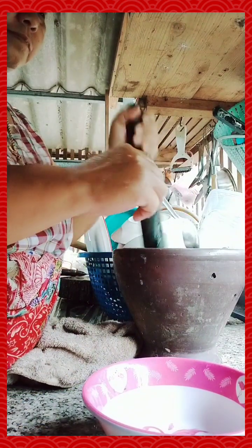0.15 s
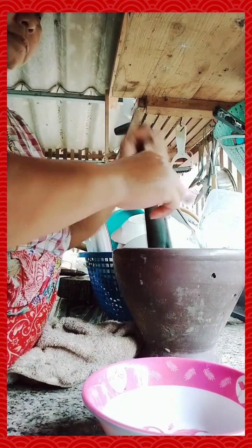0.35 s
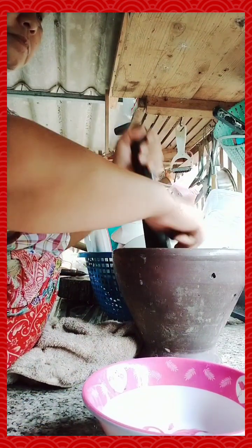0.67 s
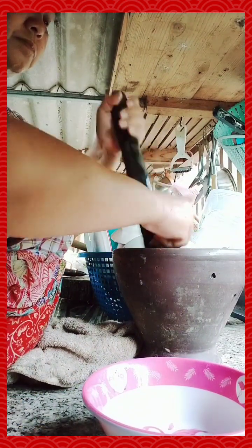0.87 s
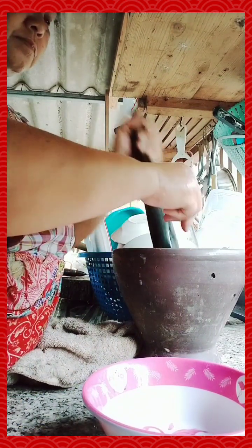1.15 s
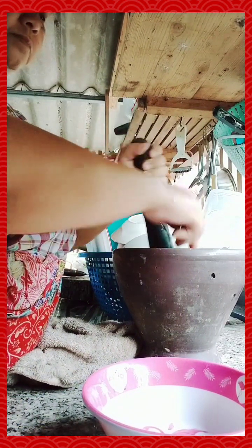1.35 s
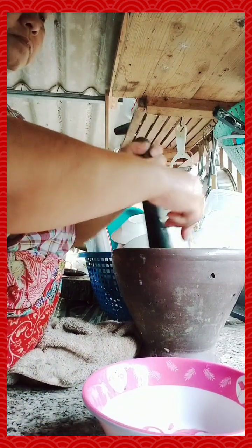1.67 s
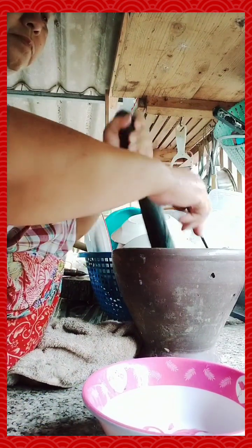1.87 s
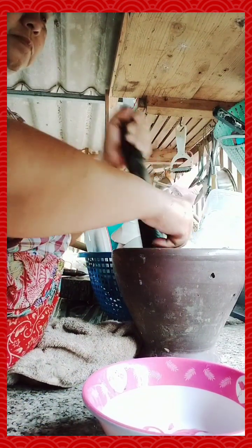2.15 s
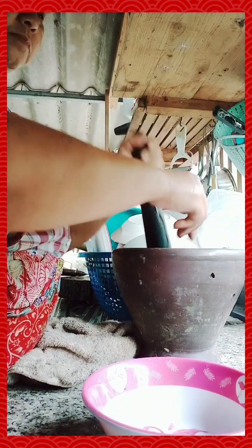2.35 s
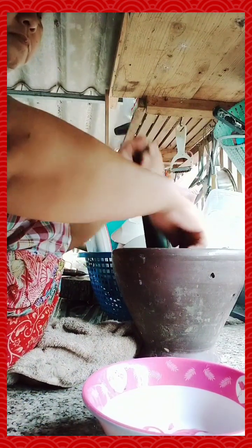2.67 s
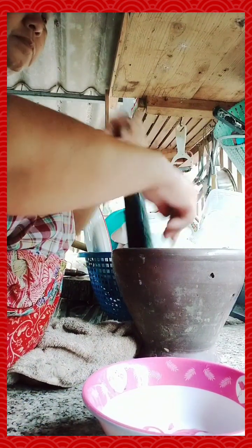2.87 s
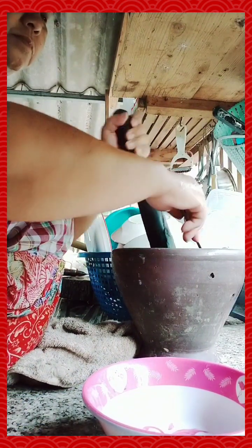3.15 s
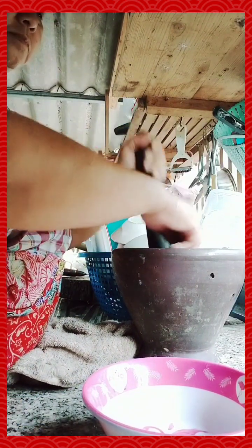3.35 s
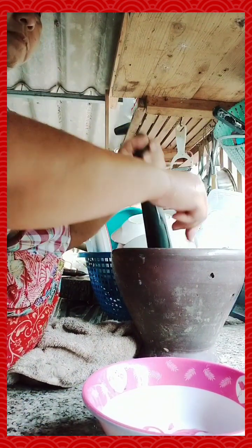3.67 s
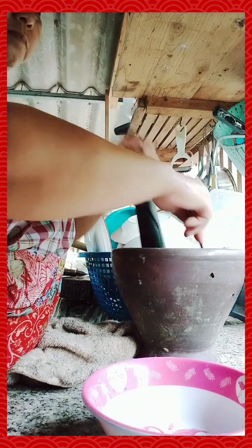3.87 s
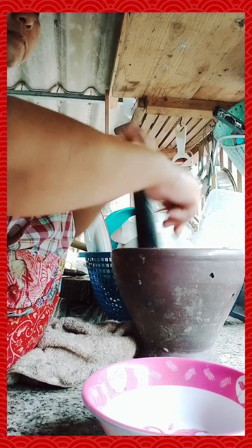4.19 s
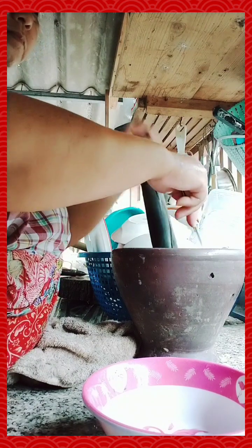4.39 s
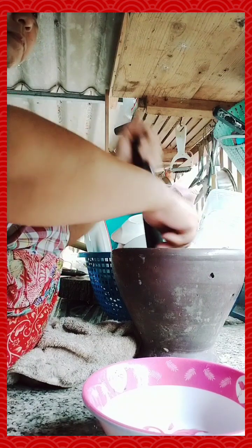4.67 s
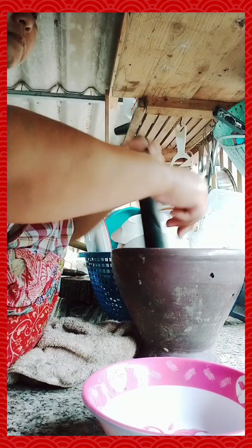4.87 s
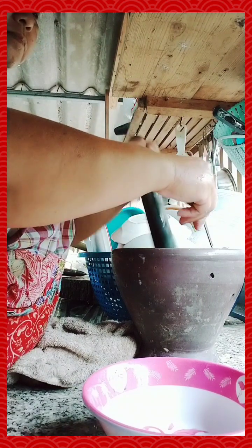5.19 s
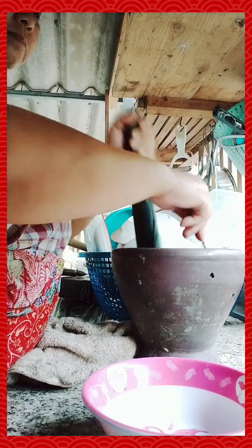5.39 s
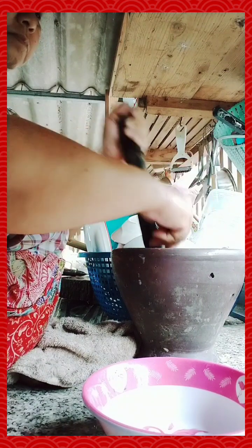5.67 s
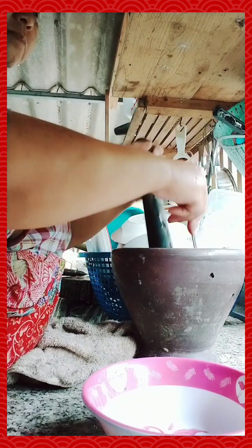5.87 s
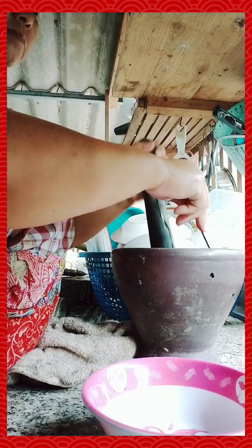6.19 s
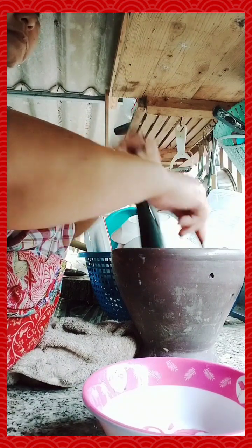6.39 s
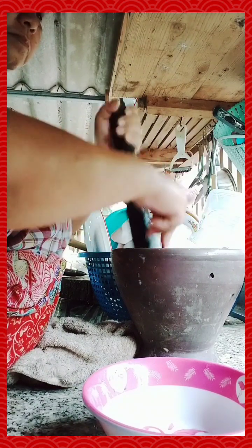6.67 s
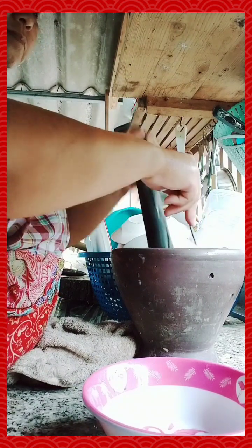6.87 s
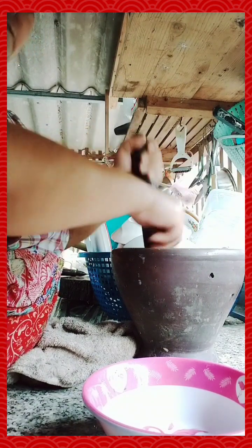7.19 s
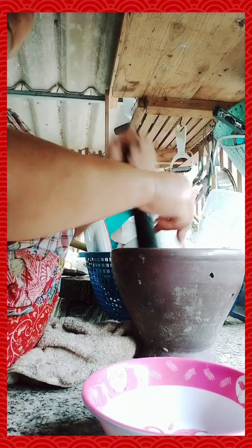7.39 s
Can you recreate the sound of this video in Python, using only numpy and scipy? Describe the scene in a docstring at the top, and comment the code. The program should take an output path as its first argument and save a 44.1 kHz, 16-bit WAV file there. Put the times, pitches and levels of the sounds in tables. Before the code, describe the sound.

A wooden pestle pounds wet paste in a clay mortar in uneven padded thumps, while a metal spoon clinks and scrapes the wall.

```python
"""In an open kitchen a wooden pestle pounds chili paste in a clay mortar, close to the microphone.
The uneven blows, a little over two a second, are padded thumps with wet noise and a short ring of the clay.
A metal spoon clinks on the wall and scrapes paste down: noise through resonances of spoon and bowl.
A small bird far off whistles in falling sines over soft air noise; the room answers weakly and diffusely,
and a limiter holds the peaks."""
import sys
import numpy as np
from scipy import signal
from scipy.fft import rfft, irfft, next_fast_len
from scipy.io import wavfile
from scipy.ndimage import uniform_filter1d, minimum_filter1d, map_coordinates

SR = 44100
rng = np.random.default_rng(int(sys.argv[2]) if len(sys.argv) > 2 else 0)


def int16_out(signal):
    """Quantize to a 16-bit WAV file."""
    q = np.round(np.clip(np.atleast_2d(signal).T, -1, 1) * 32767)
    wavfile.write(sys.argv[1], SR, q.astype(np.int16))


N = 332514
TIME = np.arange(N) / SR
AGE = np.arange(SR // 2) / SR  # time since a contact [s]; every single sound is cut at half a second

# All levels in the tables are relative: each layer adds its own trim.
# pestle blows: (time [s], wet splat [dB], thud [dB], wall ring [dB], ring t60 [s])
PESTLE_BLOWS = [(0.0098, -13, -22, -39.5, 0.48), (0.3011, -15, -15.5, -20.5, 0.54),
                (0.7822, -23.5, -17, -15, 0.27), (1.07, -24, -22, -20, 0.36),
                (1.4309, -29, -16.5, -15.5, .34), (2.0587, -23, -17.5, -15.5, .24),
                (2.3198, -20.5, -19.5, -17, 0.25), (2.7108, -48, -18, -17.5, 0.3),
                (3.0071, -13.5, -17.5, -18.5, 0.27), (3.3771, -15, -17, -18.5, 0.26),
                (4.0268, -39, -18, -17.5, .35), (5.6152, -10.5, -16.5, -27, .31),
                (6.2082, -20.5, -17.5, -22, 0.33), (6.548, -47, -18.5, -14.5, .29),
                (6.8413, -20, -22.5, -31, 0.3), (7.2028, -13.5, -16, -16.5, .23),
                (7.5184, -35, -28.5, -29.5, .29)]
# lighter knocks in the mortar, of pestle or spoon: (time [s], level [dB])
LIGHT_KNOCKS = [(2.506, -23), (2.737, -13), (3.646, -25), (3.677, -21.5), (3.715, -15), (4.341, -23),
                (4.389, -20.5), (5.921, -20), (6.566, -24.5), (7.267, -19)]
# the pestle is worked through the paste in ever softer knocks: (time [s], length [s], first knock [dB])
STIRRINGS = [(4.984, .1, -26), (5.953, .13, -23.5)]
# sticky paste smacks: (time [s], level [dB])
PASTE_SMACKS = [(0.0595, -34), (0.215, -39.5), (0.34, -32), (0.419, -34.5), (0.893, -33.5), (3.347, -42),
                (4.178, -32.5), (5.91, -30), (7.5094, -30.5)]
# the spoon strikes the wall: (time [s], clink [dB], clank [dB], clank centre [Hz])
SPOON_TAPS = [(0.4549, -8, -12, 3160), (0.464, -8.5, -18, 3150), (0.5299, -11.5, -16.5, 2620),
              (1.174, -10.5, -30, 4000), (1.7406, -3.5, -20, 5440), (2.456, -18, -15, 5500),
              (2.503, -24, -11, 2100), (3.133, -7.5, -27, 3820), (3.6902, -10, -15, 5500),
              (4.3134, -25, -23, 3100), (4.355, -7.5, -17.5, 4540), (4.366, -12, -15, 3400),
              (4.612, -25.5, -15.5, 2030), (4.673, -15, -20, 3280), (4.694, -35.5, -19.5, 2130),
              (6.316, -24, -13.5, 4100), (6.331, -15, -18, 3880), (6.4936, -28, -24, 1530),
              (6.839, -31.5, -17, 3100), (6.8807, -7, -12, 4000)]
# spoon strokes: (lands [s], presses hardest [s], lifts [s], swell [dB], hiss [dB], rasp [dB],
# grind [dB], wall ring [dB], sings for [s], rasp centre [Hz])
SPOON_STROKES = [(1.148, 1.202, 1.239, 6, -25, -22.5, -41.5, -23.5, 0.033, 3750),
                 (1.735, 1.806, 1.81, 0.5, -29.5, -24, -35, -31.5, 0.054, 3350),
                 (1.841, 1.867, 1.91, 5, -35.5, -21.5, -35, -45.5, 0.061, 2400),
                 (2.339, 2.462, 2.512, 19, -24, -17, -34, -35, .15, 3000),
                 (3.031, 3.152, 3.15, 21, -27.5, -23.5, -41, -38, .1, 3600),
                 (3.693, 3.775, 3.82, 8.5, -21.5, -14, -34, -29, 0.11, 4400),
                 (4.342, 4.425, 4.486, 17.5, -24.5, -25.5, -34, -24, .02, 3660),
                 (4.653, 4.67, 4.705, 2.5, -39, -29.5, -33.5, -41.5, 0.035, 2650),
                 (5.164, 5.329, 5.366, 17, -22.5, -20.5, -36.5, -31.5, .15, 3470),
                 (6.243, 6.32, 6.336, 14, -26, -17, -47, -28, 0.049, 4300),
                 (6.875, 6.982, 6.98, 5, -28, -25, -40, -28, .015, 4250)]
# distant bird calls: (time [s], start pitch [Hz], level [dB])
BIRD_CHIRPS = [(0.2, 3700, -48), (2.239, 3800, -41), (3.554, 3780, -44), (3.906, 5400, -46.5),
               (4.146, 5440, -43), (4.792, 4950, -50), (7.426, 4860, -47)]
# further modes of the mortar, below and above its bell mode: (frequency [Hz], level [dB], t60 [s])
CLAY_MODES = [(280, -32.5, 0.21), (592, -15.5, 0.07), (668, -16.5, 0.11), (1578, -18.5, 0.056),
              (1904, -18, 0.033), (2120, -24, 0.072), (2410, -46, 0.055), (2695, -34.5, 0.082),
              (3060, -27, 0.077), (3100, -49, 0.76), (3770, -29, 0.029)]
# resonances of spoon against clay: (frequency [Hz], width [Hz], level [dB])
SPOON_MODES = [(615, 70, 1), (1560, 90, -6), (2210, 70, 2), (2320, 70, -2), (2800, 120, -3), (3044, 25, 7),
               (3100, 40, 3), (3277, 20, 3), (3767, 45, 2), (4096, 50, 4), (4250, 160, 0), (4865, 30, 1),
               (4986, 22, 5), (5200, 50, 1), (5360, 120, 1), (5570, 70, 1), (7160, 60, -1), (7744, 60, 2),
               (9620, 35, 4), (11100, 70, -1), (11550, 150, -2), (13950, 300, 5)]
# smooth spectra of air, wet paste, thudding mortar, and the spoon's hiss, rasp and low grinding:
# (frequency [Hz], level per Hz [dB])
AIR_SPECTRUM = [(25, -10), (50, 2.5), (85, -8.5), (200, -12.5), (450, -25.5), (620, -15.5), (950, -28),
                (1190, -17.5), (1400, -24.5), (3100, -23), (4200, -34), (7500, -33.5), (9000, -45),
                (14000, -33.5), (16000, -40)]
SPLAT_SPECTRUM = [(300, 8.5), (1500, 9.5), (3500, 7.5), (6000, 5.5), (9000, -0.5), (14000, 7), (16000, 0)]
THUD_SPECTRUM = [(70, -46), (140, -8.5), (210, -5), (370, 11), (680, -12), (850, -4), (1500, -12),
                 (2200, -12.5), (3500, -24), (6000, -58)]
GRIT_SPECTRUM = [(2000, -26), (3300, -28.5), (4200, -24), (5500, -15.5), (6400, -8.5), (7700, -3),
                 (8700, -22.5), (10300, -13.5), (11500, -10), (12800, -10), (14500, -11.5), (15700, -9),
                 (16000, -36)]
RASP_SPECTRUM = [(500, -1.5), (1000, 9), (1500, 4.5), (2300, -0.5), (2650, -3.5), (3200, -1), (4200, -9),
                 (5500, -5), (7000, -32)]
GRIND_SPECTRUM = [(80, -15.5), (190, -5.5), (330, -0.5), (620, -1), (900, -22.5), (1400, -25.5)]
# reverberation of the kitchen: (frequency [Hz], t60 [s])
ROOM_DECAY = [(150, 0.55), (500, 0.31), (1200, 0.31), (4000, 0.25), (14000, 0.25)]

SQUELCH_LEAD_S, SQUELCH_DB, SQUELCH_T60_S = 0.019, -43, 0.26  # the paste gives way before the first knock
THUMP_TOP_HZ = 1050  # one upper edge for the thump of all blows
JOSTLE_S, JOSTLE_SCATTER, SETTLE_DB_PER_S = 0.022, 0.2, 101  # gap between knocks, its spread, their fading
WALL_HZ = 1187.5  # bell mode of the mortar
SPLIT_HZ, TWIN = 4.97, 0.6  # distance of the bell mode's pair, strength of the upper one
RUB_PER_S, RUB_DB = 150, 0.5  # the resting pestle roughens the ring
CHIRP_S, CHIRP_FALL = 0.0695, 0.054  # length; share of its pitch that a chirp drops
BITE_S, LIFT_T60_S = 0.0035, 0.13  # the edge bites; the drag dies once the spoon lifts
# past the hardest press the treble goes first
HISS_EASE_DB_PER_S, RASP_EASE_DB_PER_S, GRIND_EASE_DB_PER_S = 192, 73, 32
GRIND_SWELL = 0.6  # share of the swell that the low grinding follows
JUDDER_PER_S, JUDDER_DB = 110, 0.9  # the spoon sticks and slips
SING_RISE_S, SING_T60_S = 0.023, 0.26  # the wall starts to sing, then rings out
RASP_OCTAVES = 0.38  # width of the band that the point of contact favours
SAG_OCT_PER_S = 12  # the rasp sinks as the spoon slides down into the paste
TOP_HZ = 15800  # band limit


def amp(db):
    """Decibels to gain."""
    return 10 ** (np.asarray(db) / 20)


def unit(x):
    """Scale to rms 1."""
    return x / np.sqrt(np.mean(x ** 2) + 1e-20)


def along(points, hz):
    """Read (Hz, value) points on a log axis."""
    f, v = np.transpose(points)
    return np.interp(np.log(hz + 1), np.log(f + 1), v)


def fade(t60):
    """Free decay after a contact; one minus a fade is a soft onset."""
    return amp(-60 * AGE / t60)


def add(track, s, sound):
    """Mix a sound in at time s."""
    i = max(0, round(s * SR))
    track[i:i + len(sound)] += sound[:max(0, N - i)]


def filtered(x, response):
    """Shape the spectrum of x by a response of frequency."""
    m = next_fast_len(len(x) + SR // 2)
    return irfft(rfft(x, m) * response(np.fft.rfftfreq(m, 1 / SR)), m)[:len(x)]


def noise(spectrum):
    """Coloured noise of rms 1."""
    return unit(filtered(rng.standard_normal(N), lambda f: amp(along(spectrum, f))))


def wobble(rate):
    """A smooth random curve, rate knots a second."""
    knots = rng.standard_normal(int(N * rate / SR) + 4)
    return map_coordinates(knots, [TIME * rate])


def kitchen_air():
    """Soft coloured noise whose level drifts slightly."""
    return amp(-51.5 + 1.13 * wobble(6.6)) * noise(AIR_SPECTRUM)


def paste():
    """Wet paste spits under blows, squelches when stirred, smacks as it lets go and crackles faintly."""
    spit = np.zeros(N)
    for s, splat_db, *_ in PESTLE_BLOWS:
        splat = fade(0.01) + amp(-2) * fade(0.044) + amp(-22.5) * fade(0.65)
        add(spit, s, amp(splat_db - 19.0) * splat)
    for s, *_ in STIRRINGS:
        add(spit, s - SQUELCH_LEAD_S, amp(SQUELCH_DB) * fade(SQUELCH_T60_S))
    for s, db in PASTE_SMACKS:
        add(spit, s, amp(db - 9.0) * fade(0.1))
    crackle = amp(-65 + 7.3 * wobble(70))
    return (spit + crackle) * noise(SPLAT_SPECTRUM)


def blows_and_knocks():
    """Pestle blows thump through the paste and shake mortar and floor; lighter knocks only thud."""
    out, shake = np.zeros((2, N))
    for s, _, thud_db, _, _ in PESTLE_BLOWS:
        add(out, s, amp(thud_db + 11.0) * thump(251.4, THUMP_TOP_HZ) + amp(thud_db + 9.5) * clay())
        add(shake, s, amp(thud_db - 2.5) * fade(0.049))
    for s, db in LIGHT_KNOCKS + jostles():
        add(out, s, amp(db - 1.0) * thump(263, 690))
        add(shake, s, amp(db - 9) * fade(0.087))
    return out + shake * noise(THUD_SPECTRUM)


def thump(low_hz, top_hz):
    """One cushioned push of peak 1: harder contact reaches higher."""
    top_hz = np.clip(top_hz, low_hz * 2, SR / 4)
    band = signal.butter(4, [low_hz, top_hz], "band", fs=SR, output="sos")
    push = signal.sosfilt(band, signal.unit_impulse(len(AGE)))
    return push / np.abs(push).max()


def clay():
    """Further modes of the mortar: the pressing pestle shifts their pitch and strength at every blow."""
    ring = np.zeros(len(AGE))
    for hz, db, t60 in CLAY_MODES:
        detune, lift, turn = rng.standard_normal(3)
        tone = np.sin(2 * np.pi * hz * (1 + 0.012 * detune) * AGE + np.pi * turn)
        ring += amp(db + 2 * lift) * fade(t60) * tone
    return ring * (1 - fade(0.0053))


def jostles():
    """The (s, dB) knocks of the stirring pestle, unevenly spaced and fading."""
    knocks = []
    for s, length, db in STIRRINGS:
        gaps = JOSTLE_S * np.exp(JOSTLE_SCATTER * rng.standard_normal(size=16))
        waits = np.cumsum(gaps) - gaps[0]
        knocks += [(s + wait, db - SETTLE_DB_PER_S * wait) for wait in waits if wait < length]
    return knocks


def bowl():
    """Every blow rings the wall; the pestle damps it more or less as it rests in the paste."""
    out = np.zeros(N)
    for s, _, _, ring_db, t60 in PESTLE_BLOWS:
        add(out, s, amp(ring_db + 4.5) * wall(t60))
    return out


def wall(t60):
    """The not quite round bowl splits its bell mode into a pair: the ring holds, drops, returns faintly."""
    lower = np.sin(2 * np.pi * (WALL_HZ - SPLIT_HZ / 2) * AGE)
    upper = np.sin(2 * np.pi * (WALL_HZ + SPLIT_HZ / 2) * AGE)
    pair = (lower + TWIN * upper) / (1 + TWIN)
    rub = amp(RUB_DB * wobble(RUB_PER_S)[:len(AGE)])
    return pair * rub * fade(t60) * (1 - fade(0.017))


def kitchen(x, count=8):
    """A weak diffuse answer of roof and walls: noise tails crossfade as the cook moves."""
    out = np.zeros(N)
    for k in range(count):
        hz, t, z = signal.stft(rng.standard_normal(SR // 2), SR, nperseg=256)
        decay = amp(-60 * t / along(ROOM_DECAY, hz)[:, None])
        tail = signal.istft(z * decay, SR, nperseg=256)[1][:len(AGE)] * (1 - fade(0.0085))
        share = np.clip(1 - np.abs(np.linspace(0, count - 1, N) - k), 0, 1)
        out += signal.fftconvolve(x * share, tail / np.linalg.norm(tail))[:N]
    return out


def bird():
    """Short falling, trembling whistles, blurred by distance."""
    out = np.zeros(N)
    u = np.clip(AGE / CHIRP_S, 0, 1)  # progress through the chirp
    for s, start_hz, db in BIRD_CHIRPS:
        hz = start_hz * (1 - CHIRP_FALL * u) + 110 * wobble(400)[:len(AGE)]
        add(out, s, amp(db) * np.sin(np.pi * u) * np.sin(2 * np.pi * np.cumsum(hz) / SR))
    echoes = rng.standard_normal(len(AGE)) * fade(0.12)
    return amp(-5) * signal.fftconvolve(out, echoes / np.linalg.norm(echoes))[:N]


def spoon():
    """The spoon lands with a chattering clink, then drags along the wall, which sings at its bell mode."""
    return taps() + scrapes()


def taps():
    """Bursts of friction noise: a bright clink and a clank focused on its own band."""
    clink, clank = np.zeros((2, N))
    for s, db, clank_db, _ in SPOON_TAPS:
        add(clink, s, amp(db - 14.5) * fade(0.069))
        add(clank, s, amp(clank_db - 8) * fade(0.064))
    # each clank keeps its own colour while the spoon stays on the spot
    held = [(s + wait, hz) for s, _, _, hz in SPOON_TAPS for wait in (0, 0.009)]
    chatter = friction(grain_db=3, patchy_db=3)
    bright = clink * voiced(chatter, GRIT_SPECTRUM)
    return bright + clank * focus(voiced(chatter, RASP_SPECTRUM), held, octaves=0.25)


def scrapes():
    """One slipping contact heard as hiss, rasp and grind, with the wall singing along."""
    hiss, rasp, grind, ring = drag()
    slips = friction(grain_db=4.5, patchy_db=4)
    moving_rasp = focus(voiced(slips, RASP_SPECTRUM), contact(), octaves=RASP_OCTAVES)
    sing = unit(np.sin(2 * np.pi * WALL_HZ * TIME + 0.9 * wobble(55)) * amp(2.5 * wobble(110)))
    scrape = amp(-3.5) * hiss * voiced(slips, GRIT_SPECTRUM)
    scrape += amp(-8.5) * rasp * moving_rasp
    scrape += amp(-5.0) * grind * voiced(slips, GRIND_SPECTRUM)
    return scrape + amp(1.5) * ring * sing


def friction(grain_db, patchy_db):
    """Grit catches under the edge; the moving contact point favours ever different resonances."""
    catches = amp(grain_db * wobble(1500) + 1.6 * wobble(260))
    # the hand keeps the drag even while single grains catch and let go
    drag_power = np.abs(uniform_filter1d(catches ** 2, size=700))
    slips = rng.standard_normal(N) * catches / np.sqrt(drag_power + 1e-9)
    z = signal.stft(slips, nperseg=512)[2]
    # smooth random patches over pitch and time
    patch = np.outer(np.hanning(5), np.hanning(15))
    field = signal.fftconvolve(rng.standard_normal(z.shape), patch, "same")
    return signal.istft(z * amp(patchy_db * unit(field)), nperseg=512)[1][:N]


def resonances(modes, f):
    """Summed strength of (Hz, width, dB) modes."""
    return np.sqrt(sum(amp(db) ** 2 / (1 + (2 * (f - hz) / width) ** 2) for hz, width, db in modes))


def voiced(slips, spectrum):
    """Friction heard through spoon and bowl, rms 1."""
    ringing = 2.1  # strength of the resonances against the plain noise
    return unit(filtered(
        slips, lambda f: np.hypot(1, ringing * resonances(SPOON_MODES, f)) * amp(along(spectrum, f))))


def focus(x, centres, octaves):
    """Favour a band that moves through the (s, Hz) centres, evening out the power."""
    hz, t, z = signal.stft(x, SR, nperseg=256)
    distance = np.log2((hz[:, None] + 1) / np.interp(t, *np.transpose(centres)))  # octaves
    band = np.exp(-0.5 * (distance / octaves) ** 2) + 0.19
    power = np.mean(np.abs(z) ** 2, axis=1)
    return unit(signal.istft(z * band / np.sqrt(power @ band ** 2), SR, nperseg=256)[1][:N])


def drag():
    """Gains of hiss, rasp, grind and wall ring: a stroke bites, swells to its hardest press, eases, lifts."""
    hiss, rasp, grind, ring = np.zeros((4, N))
    for lands, press, lifts, swell_db, hiss_db, rasp_db, grind_db, ring_db, sings, _ in SPOON_STROKES:
        t = lands + AGE
        touch = np.minimum(AGE / BITE_S, 1) * np.interp(t - lifts, AGE, fade(LIFT_T60_S))
        effort_db = np.interp(t, [lands, press], [-swell_db, 0])
        easing = np.maximum(t - press, 0)
        add(hiss, lands, touch * amp(hiss_db + effort_db - HISS_EASE_DB_PER_S * easing))
        add(rasp, lands, touch * amp(rasp_db + effort_db - RASP_EASE_DB_PER_S * easing))
        add(grind, lands, touch * amp(grind_db + GRIND_SWELL * effort_db - GRIND_EASE_DB_PER_S * easing))
        ring_out = np.interp(AGE - sings, AGE, fade(SING_T60_S))
        add(ring, lands, amp(ring_db) * np.minimum(AGE / SING_RISE_S, 1) * ring_out)
    judder = amp(JUDDER_DB * wobble(JUDDER_PER_S))
    return hiss * judder, rasp * judder, grind * judder, ring


def contact():
    """(s, Hz) centre of the rasp: steady until the hardest press, then sinking."""
    points = []
    for lands, press, lifts, *_, hz in SPOON_STROKES:
        sunk_hz = hz * 2 ** (-SAG_OCT_PER_S * (lifts - press))
        points += [(lands, hz), (press, hz), (lifts, sunk_hz)]
    return points


def scene():
    """Mortar and spoon close by and a bird far off, over the soft air of the kitchen."""
    contacts, ring = blows_and_knocks() + paste() + spoon(), bowl()
    # the wall faces the microphone, so its ring arrives mostly direct
    sent = contacts + amp(-7) * ring
    return (contacts + ring + amp(-12.5) * kitchen(sent) + bird() + kitchen_air())[None]


def record(dry):
    """A fast limiter holds the peaks; then everything above the band limit is cut."""
    ceiling = 0.5
    needed = np.minimum(1, ceiling / (np.abs(dry[0]) + 1e-9))
    gain = uniform_filter1d(minimum_filter1d(needed, size=129), size=129)
    return filtered(dry[0] * gain, lambda f: f < TOP_HZ)[None]


dry = scene()
out = record(dry)
int16_out(out)
```